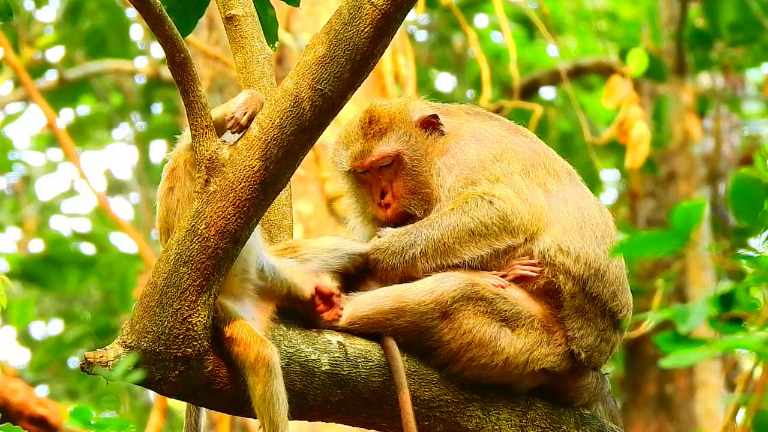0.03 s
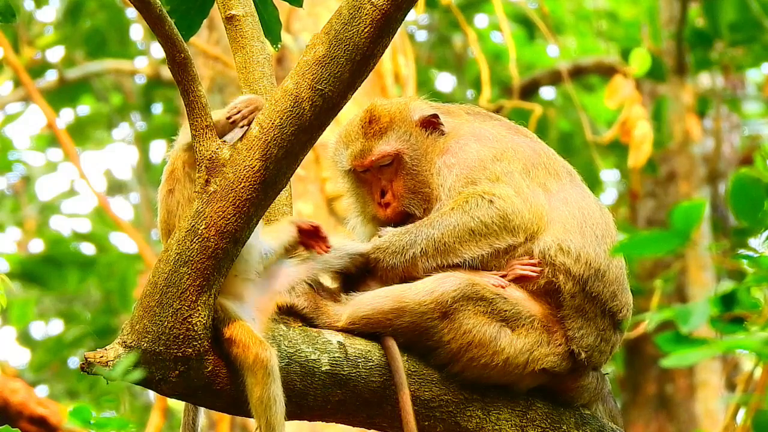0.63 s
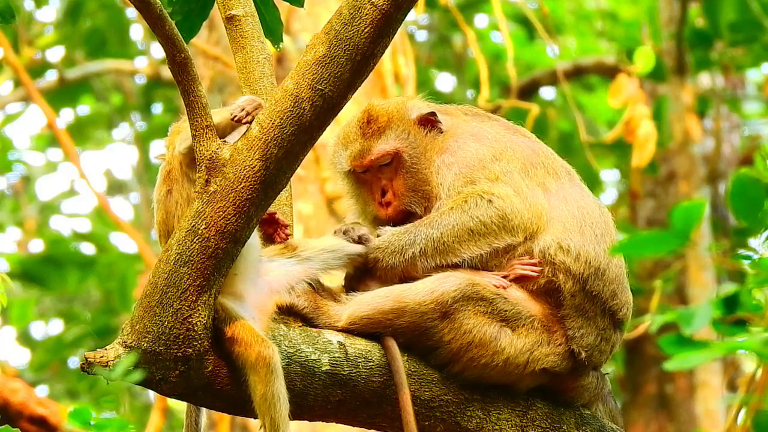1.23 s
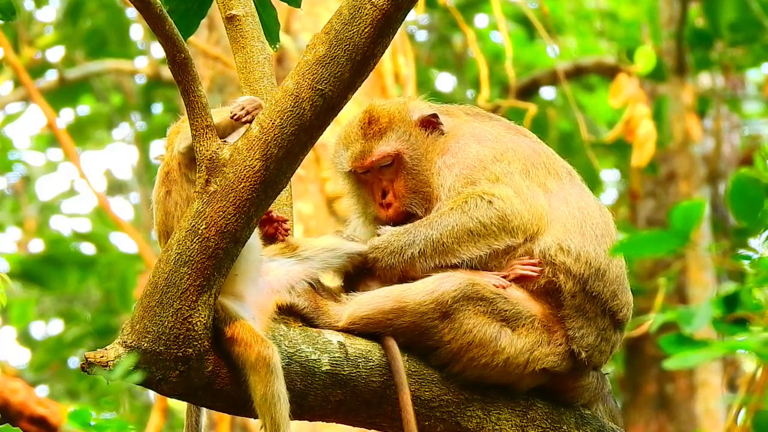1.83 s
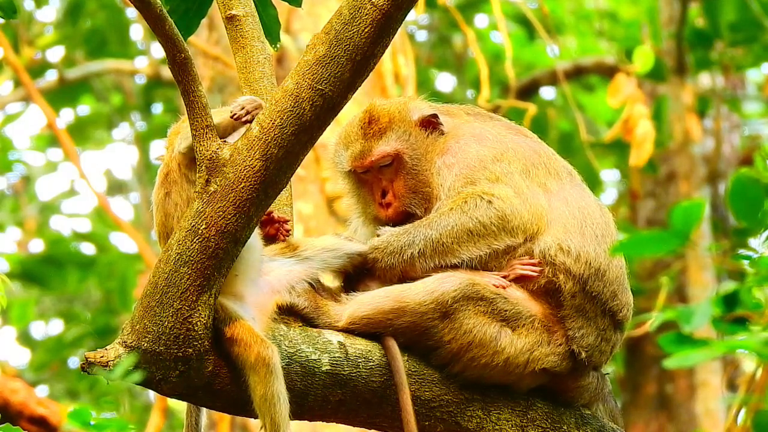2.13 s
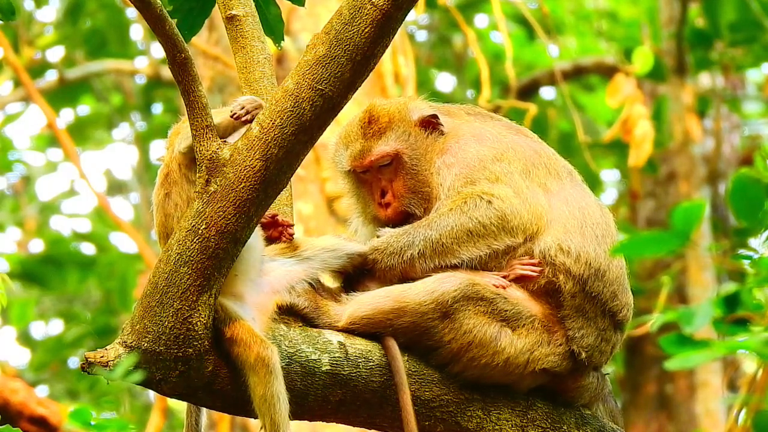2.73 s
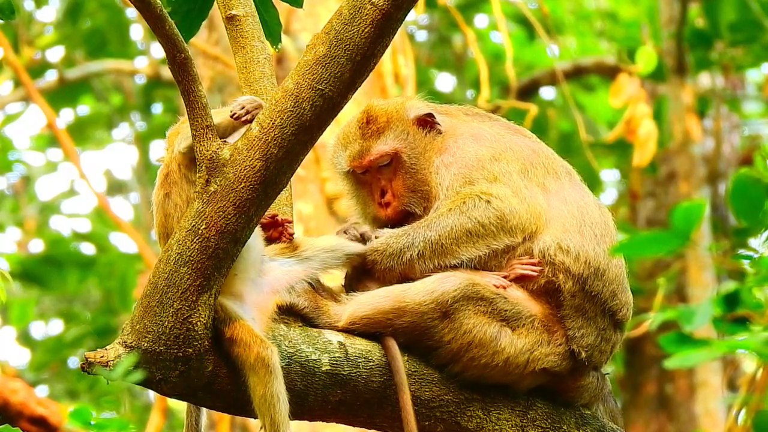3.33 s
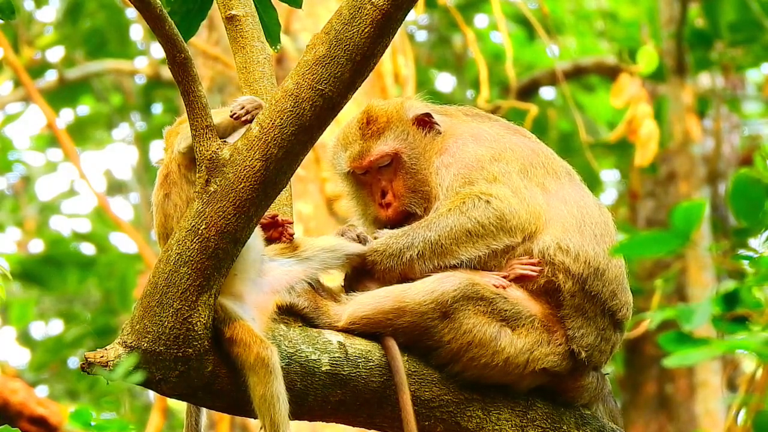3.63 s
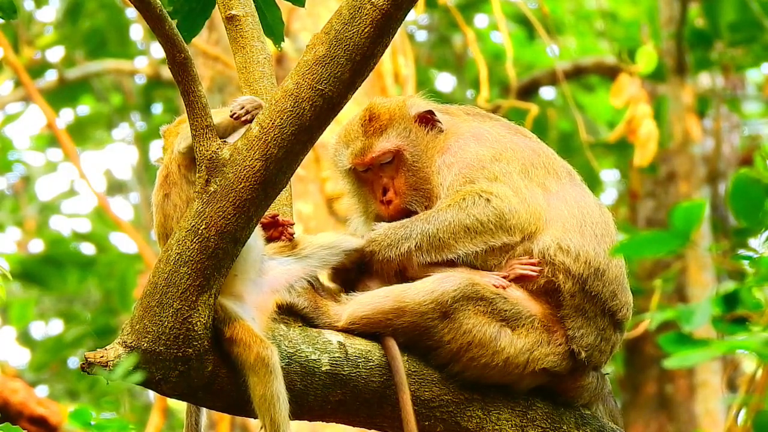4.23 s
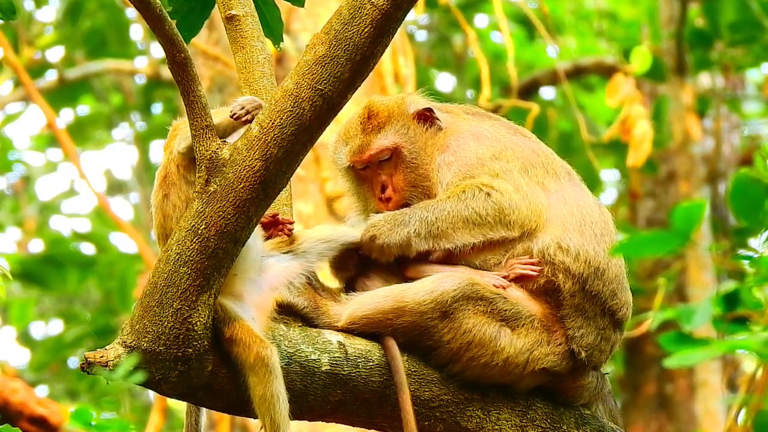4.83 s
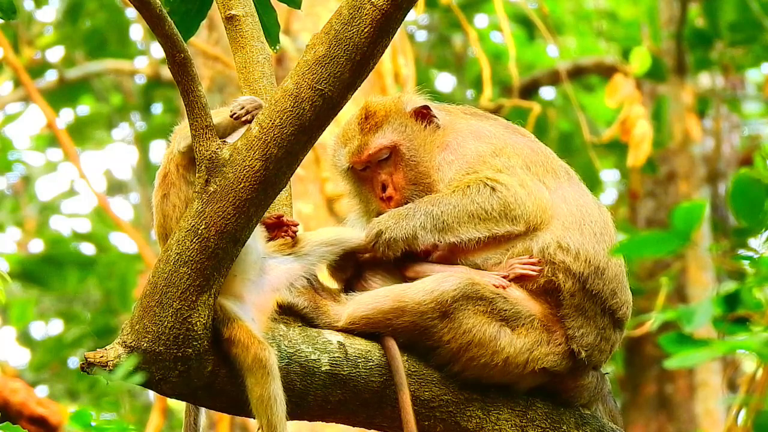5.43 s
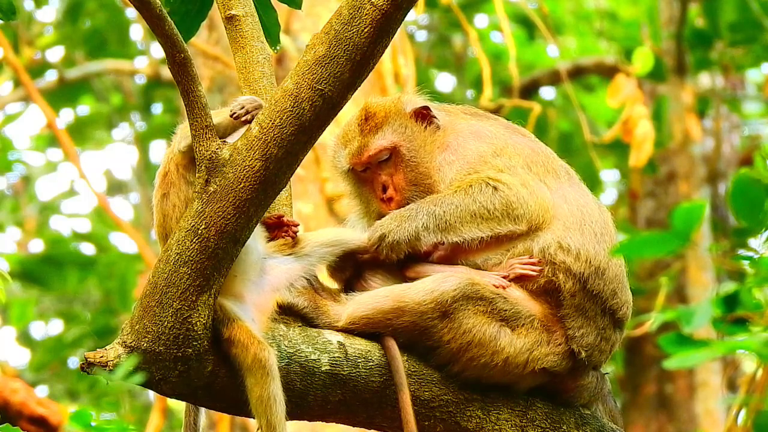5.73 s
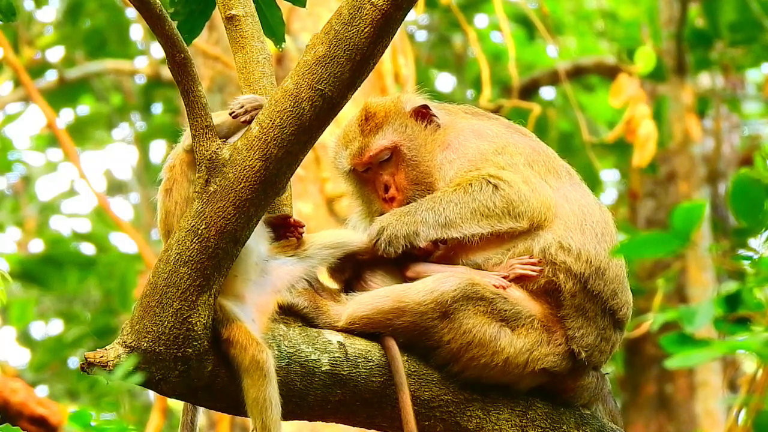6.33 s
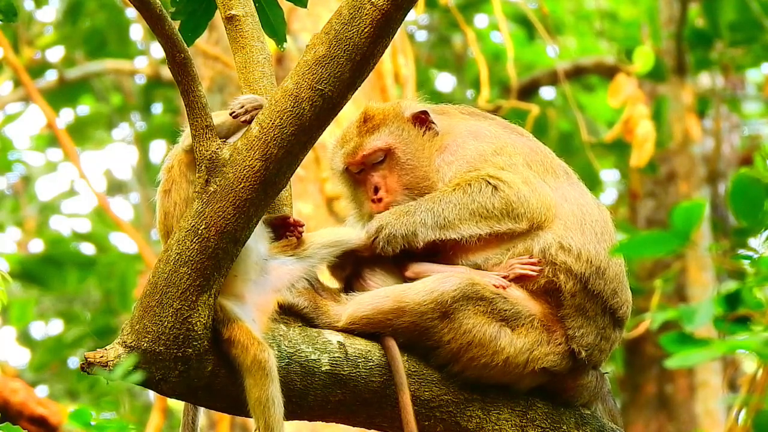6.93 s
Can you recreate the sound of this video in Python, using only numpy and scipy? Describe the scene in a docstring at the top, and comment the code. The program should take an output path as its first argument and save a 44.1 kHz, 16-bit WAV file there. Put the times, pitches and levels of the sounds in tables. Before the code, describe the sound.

In a forest, a low, throbbing engine far away and a faint insect hiss are heard first. Then an infant monkey in front of the microphone cries five times, the second cry weaker and broken. The other four swoop up, sag and turn hoarse, ringing briefly among the trees. Small squeaks and scratchy sounds fall in the gaps, while very faint chirps and a couple of hoots come from the distance.

```python
"""Infant monkey crying in a forest

Four shrill, arched cries sag and turn hoarse, and one more breaks upward; thin whimpers and weak rasps
fall between them. The cries are vocal folds and puffs of air ringing in a small throat, and trunks and
foliage echo them. Behind them a far engine rumbles under faint hoots, chirps and a hiss of insects."""
import sys
import numpy as np
from scipy import signal
from scipy.fft import rfft, irfft, next_fast_len
from scipy.io import wavfile
from scipy.ndimage import uniform_filter1d

SR = 44100
rng = np.random.default_rng(int(sys.argv[2]) if len(sys.argv) > 2 else 0)


def digitize_waveform(pressure):
    """Quantize a signal to 16-bit integers and store it at the path in sys.argv[1].

    Rows of a 2-D input are taken as channels; values are limited to [-1, 1].
    """
    field = np.atleast_2d(pressure).T
    bounded = np.clip(field, -1, 1)
    quanta = np.round(bounded * 32767).astype(np.int16)
    wavfile.write(sys.argv[1], SR, quanta)


N = 312669
TIME = np.arange(N) / SR

# resonances of the small throat and mouth: freq_hz, gain_db
THROAT = [(850, -24.5), (1820, -16.5), (2330, -7), (2700, -8), (3100, -8.5), (3450, 0.5), (3720, 2),
          (3980, -7.5), (4250, -16.5), (4520, -12), (4780, -6), (5300, -3), (6200, 1), (7000, -3),
          (8400, -12.5), (9600, -26), (11000, -43.5), (15000, -55)]
# how alike diffuse sound is in the two ears: freq_hz, likeness (0-1)
EAR_LIKENESS = [(60, 0.96), (130, 1), (290, 0.94), (640, 0.94), (1410, 0.91), (3100, 0.76), (6820, 0.27),
                (15000, 0.0)]


def cries(gain_db=-1, tail_s=0.051):
    """Shrill arched calls, clear in the middle and hoarse at the edges."""
    # one cry a row: start_s, crest_s, crack_s, collapse_s, swell_s, start_hz, top_hz, sag_hz_per_s,
    # overshoot_hz, peak_db (before gain_db), bright_db, onset_rough (0-1)
    calls = [(2.902, 2.971, 3.103, 3.125, .15, 772, 922, 452, -2, -17, -2.0, 0.25),
             (4.921, 4.966, 5.130, 5.131, 0.071, 676, 865.3, 102.3, 25.5, -16.5, -2, 0.51),
             (5.825, 5.885, 6.080, 6.094, 0.079, 715, 936, 391, 35, -16.5, -3.5, 0.56),
             (6.747, 6.794, 6.985, 6.986, 0.057, 716, 914.3, 172, -1.5, -16.5, -3.5, 0.46)]
    out = np.zeros(N)
    for call in calls:
        start_s, _, _, collapse_s = call[:4]
        at, t, gate = span(start_s, collapse_s + tail_s, rise_s=0.017, fall_s=0.025)
        pitch, level_db, bright_db, rough = cry_shape(t, *call)
        out[at] += gate * from_db(level_db + gain_db) * mouth(larynx(pitch, rough, THROAT), bright_db)
    return out


def cry_shape(t, start_s, crest_s, crack_s, collapse_s, swell_s, start_hz, top_hz, sag_hz_per_s,
              overshoot_hz, peak_db, bright_db, onset_rough):
    """Pitch, level, brightness and roughness of a cry that swoops up, sags, cracks and collapses."""
    rise_hz_per_s, bend_hz, settle_s, drop_hz, lowest_hz = 4300, 22, 0.01526, 111.6, 620
    swell_db, fade_lead_s, fade_db_per_s = 14.5, 0.074, 91
    clear_rough, collapse_rough, collapse_bright_db = .17, 0.359, -1.17
    before, after = np.maximum(crest_s - t, 0), np.maximum(t - crest_s, 0)
    to_swell = np.maximum(1 - (t - start_s) / swell_s, 0)
    spent = np.exp((t - collapse_s) / .03)
    crack = np.exp(-((t - crack_s) / .013) ** 2)   # a rough burst in the main resonance
    swoop = top_hz + overshoot_hz - rise_hz_per_s * before
    rising = bend_hz * np.logaddexp(swoop / bend_hz, start_hz / bend_hz)   # eases out of start_hz
    falling = top_hz + overshoot_hz * np.exp(-after / settle_s) - sag_hz_per_s * after - drop_hz * spent
    pitch = np.where(t < crest_s, rising, np.maximum(falling, lowest_hz))
    fade_db = fade_db_per_s * np.maximum(t - collapse_s + fade_lead_s, 0)
    level_db = peak_db - swell_db * to_swell ** 2 - fade_db + 0.5 * crack
    thin_db = bright_db + (collapse_bright_db - bright_db) * np.sqrt(np.minimum(spent, 1))
    opening_db = -5 * np.exp((start_s - t) / .02)   # dull while the mouth is still opening
    rough = clear_rough + (onset_rough - clear_rough) * np.sqrt(to_swell)
    rough += (collapse_rough - clear_rough) * spent + 0.13 * crack
    return pitch, level_db, thin_db + opening_db - 1.5 * crack, np.clip(rough, 0, 0.7)


def broken_cry(gain_db=-1, break_s=3.462, odd_db=-8.5):
    """A weaker call that catches, holds a low note, then cracks into a harsh upper register."""
    # course of the call: time_s, pitch_hz, level_db (before gain_db), bright_db, rough (0-1)
    contour = [(3.312, 755, -36.5, -13, 0.9), (3.358, 751, -23, -2, 0.84), (3.385, 769, -25.5, -1.2, 0.15),
               (3.42, 776.4, -25, -1.5, 0.21), (3.451, 761, -29.5, -3, 0.21),
               (3.468, 869.5, -25.5, -2, 0.6), (3.487, 817, -22.5, -1.5, .55),
               (3.549, 810, -25.5, -1.5, 0.6), (3.63, 791, -31.5, -0.5, 0.8)]
    # colour of the narrower mouth before the break: freq_hz, gain_db
    narrow_mouth = [(1600, 4), (2320, 6), (3100, -2), (3850, -12), (4650, 5), (5500, -1)]
    at, t, gate = span(contour[0][0], contour[-1][0], rise_s=0.018, fall_s=0.026)
    pitch, level_db, bright_db, rough = in_time(contour, t)
    broken = np.clip((t - break_s) / 0.0073, 0, 1)
    voice = larynx(pitch, rough, THROAT, odd_db * broken)   # weak odd partials: it sounds an octave up
    held = (1 - broken) * (1 - rough)
    voice += held * (colour(voice, narrow_mouth) - voice)
    out = np.zeros(N)
    out[at] = gate * from_db(level_db + gain_db) * mouth(voice, bright_db)
    return out


def rasps(gain_db=-1, pitch_hz=753, wander=0.065):
    """Weak, scratchy sounds of wandering pitch; two trail the cries like faint echoes."""
    # weak rasps: start_s, length_s, peak_db (before gain_db)
    scratches = [(4.366, 0.071, -33), (5.563, 0.22, -38.5), (6.243, 0.16, -34), (6.453, 0.229, -29.5),
                 (6.709, .07, -28.5)]
    # colour of the rasps: freq_hz, gain_db
    rasp_colour = [(900, -20), (1600, -2), (2200, -3), (2800, -6), (3300, -2), (4600, 2), (5600, -5),
                   (6500, -3.5), (8000, -21), (11000, -38), (15000, -50)]
    out = np.zeros(N)
    for start_s, length_s, peak_db in scratches:
        at, t, gate = span(start_s, start_s + length_s)
        rasp = larynx(pitch_hz * (1 + wander * drift(15, len(t))), rough=0.53, spectrum=rasp_colour)
        level_db = peak_db + swell((t - start_s) / length_s, peak_share=0.23, onset_db=-15, end_db=-10.5)
        out[at] += gate * from_db(level_db + gain_db) * rasp
    return out


def larynx(pitch, rough, spectrum, odd_db=0):
    """Vocal folds and turbulent air through the throat; roughness unsettles every cycle."""
    jitter, wobble, shimmer, air, flutter_db, flare_db = 0.0687, 0.00366, 0.72, 0.75, 2.5, 7
    size = len(pitch)
    pitch = pitch * (1 + wobble * drift(50, size) + jitter * rough ** 2 * drift(158, size))
    phase = 2 * np.pi * np.cumsum(pitch) / SR
    folds = np.zeros(size)
    for k in range(1, 18):
        partial_db = at_hz(spectrum, k * pitch) + flutter_db * drift(20.5, size)
        # as the voice cracks, single partials flare up and drop out
        partial_db += flare_db * rough * np.tanh(drift(47, size))
        folds += from_db(partial_db + odd_db * (k % 2)) * np.sin(k * phase + 2 * np.pi * rng.random())
    folds = evened(folds) * (1 + shimmer * rough * np.tanh(drift(640, size)))
    # air escapes in a puff each time the folds open, and is duller than the partials
    puffs = colour(rng.standard_normal(size) * (1 + np.cos(phase)), spectrum)
    puffs = signal.sosfilt(signal.butter(4, 7500, fs=SR, output="sos"), puffs)
    return rms_one(folds + air * rough * puffs)


def mouth(voice, bright_db, split_hz=4500):
    """The mouth shifts power from the main resonance to the upper ones; bright_db is their share."""
    low = signal.sosfiltfilt(signal.butter(4, split_hz, fs=SR, output="sos"), voice)
    upper_share = np.clip(from_db(bright_db) ** 2, .05, .95)
    return np.sqrt(1 - upper_share) * evened(low) + np.sqrt(upper_share) * evened(voice - low)


def whimpers():
    """Thin squeaks, most of them falling, through an almost closed mouth."""
    # whimpers: start_s, length_s, start_hz, end_hz, peak_db, peak_share (0-1 of the length)
    calls = [(3.11, .14, 1570, 965, -28.5, 0.76), (4.331, .028, 2950, 2540, -31, .3),
             (4.36, .03, 3430, 3130, -32, 0.6), (4.385, .11, 1280, 766, -36.5, 0.64),
             (6.1, 0.066, 1530, 1890, -38, 0.63), (6.68, 0.039, 1070, 1210, -38.5, 0),
             (6.745, 0.093, 1220, 1247, -25.5, 0.27), (6.83, 0.057, 1130, 960, -36, 0.3),
             (6.97, 0.087, 1820, 1746, -36.5, 0.3)]
    return thin_calls(calls, jitter=.027, shimmer_db=2.5, onset_db=-7.5, end_db=-9)


def thin_calls(calls, jitter, shimmer_db, onset_db, end_db, octave_db=-22):
    """Nearly pure, unsteady glides with a faint octave above."""
    out = np.zeros(N)
    for start_s, length_s, start_hz, end_hz, peak_db, peak_share in calls:
        at, t, gate = span(start_s, start_s + length_s)
        progress = (t - start_s) / length_s
        pitch = start_hz + (end_hz - start_hz) * progress
        level_db = peak_db + swell(progress, peak_share, onset_db, end_db)
        phase = 2 * np.pi * np.cumsum(pitch * (1 + jitter * drift(105, len(t)))) / SR
        tone = np.sqrt(2) * (np.sin(phase) + from_db(octave_db) * np.sin(2 * phase))
        out[at] += gate * from_db(level_db + shimmer_db * drift(49, len(t))) * tone
    return out


def mic_ports(x):
    """The two microphone ports shade and delay the direct sound differently at each frequency."""
    # shading between the ports: freq_hz, left_over_right_db
    shading = [(1300, -2.2), (2400, -3), (4400, 0.3), (8000, -0.2)]
    # phase between the ports: freq_hz, left_lead_rad
    lead = [(2000, -0.015), (4300, -0.46), (5800, -0.64), (9500, -0.49)]
    size = next_fast_len(N)
    hz = np.arange(size // 2 + 1) * SR / size
    left = from_db(at_hz(shading, hz) / 2) * np.exp(.5j * at_hz(lead, hz))
    return irfft(rfft(x, size) * np.array([left, 1 / left]), size)[:, :N]


def forest(x, near_db=-7, near_t60_s=0.58, far_db=-12, build_s=0.019):
    """A few trunks answer clearly; foliage scatters a tail that builds up, and far trees draw it out."""
    # decay of the far trees' echo: freq_hz, t60_s
    far_t60 = [(1000, 4.2), (2600, 3.1), (3700, 1.2), (6500, 1.7), (10000, 0.92)]
    # echoes off the branch and the nearest trunks: delay_s, level_db, left_over_right_db
    trunks = [(.0032, -27, 1), (0.0109, -12, 11), (.031, -21, 6), (0.046, -25, -1), (.077, -20.5, -6)]
    t = TIME[:SR]
    edges = np.geomspace(500, 16000, 11)
    response = np.zeros((2, SR))
    for low, high in zip(edges, edges[1:]):
        hz = np.sqrt(low * high)
        band = signal.butter(2, [low, high], "band", fs=SR, output="sos")
        mid, side = signal.sosfilt(band, rng.standard_normal((2, SR)))
        scatter = spread(mid, side, hz)
        for level_db, t60_s in (near_db, near_t60_s), (far_db, at_hz(far_t60, hz)):
            decay = np.exp(-np.log(1000) * t / t60_s) * np.minimum(t / build_s, 1)
            response += from_db(level_db) * scatter * decay / np.linalg.norm(decay)
    for delay_s, level_db, left_db in trunks:
        response[:, round(delay_s * SR)] += pan(from_db(level_db), left_db)[:, 0]
    # long waves pass round the leaves and stems, and the shortest are absorbed
    leaves = signal.butter(3, [1500, 7800], "band", fs=SR, output="sos")
    return signal.fftconvolve(x[None], signal.sosfilt(leaves, response), axes=1)[:, :N]


def engine(gain_db=0.2, rumble_db=-2.5, waver=0.02496, throb_db=2.5):
    """A far engine: wavering, throbbing low tones in a rumble."""
    # slow swells of the engine: time_s, level_db (before gain_db)
    swells = [(0, -32.5), (1.3, -31.0), (2.6, -30), (3.7, -28), (4.9, -32), (5.9, -28.5), (7.09, -31)]
    # colour of the rumble: freq_hz, gain_db
    rumble_colour = [(22, -41), (35, -31), (50, 0), (62, -1.5), (80, 5), (105, 5), (135, 1.5), (160, -1),
                     (200, -12), (260, -22), (400, -53.5)]
    # engine tones: pitch_hz, relative_db
    tones = [(101.7, -4.5), (126.8, -12), (78.2, -19.5)]
    hum = np.zeros(N)
    for hz, relative_db in tones:
        phase = 2 * np.pi * np.cumsum(hz * (1 + waver * drift(3.91, N))) / SR
        hum += np.sqrt(2) * from_db(relative_db + throb_db * drift(5, N)) * np.sin(phase)
    rumble = from_db(rumble_db) * stereo_noise(rumble_colour)
    return from_db(in_time(swells, TIME)[0] + gain_db) * (hum + rumble)


def far_hoots():
    """A faint whistle and two hoots, each nearly level in pitch."""
    # far calls: start_s, length_s, start_hz, end_hz, peak_db, peak_share (0-1 of the length)
    calls = [(3.15, 0.14, 3860, 3880, -36, .3), (3.7, .6, 642, 636, -48.5, 0),
             (4.5, 0.13, 490, 464, -43.5, .35)]
    return thin_calls(calls, jitter=0.0063, shimmer_db=4, onset_db=-14, end_db=-8)


def far_chirps(count=80, length_s=.09, lowest_hz=330, level_db=-53, spread_db=3, db_per_octave=-2):
    """Faint blips from far off, at random times and pitches, weaker with each octave."""
    calls = []
    for when, height, glide, strength in rng.random((count, 4)):
        octaves = 2.2 * height
        start_hz = lowest_hz * 2 ** octaves
        end_hz = start_hz * 2 ** ((glide - .5) / 4)
        peak_db = level_db + db_per_octave * octaves + spread_db * (2 * strength - 1)
        calls.append((when * (N / SR - length_s), length_s, start_hz, end_hz, peak_db, .5))
    return thin_calls(calls, jitter=.02, shimmer_db=5.5, onset_db=-1, end_db=-3)


def canopy(hiss_db=-40.5):
    """Leaves and a far insect chorus, from which a few thin tones stand out."""
    # colour of air and insects in the treetops: freq_hz, gain_db
    hiss_colour = [(200, 1.5), (330, 0.5), (650, 0), (1000, -2), (1450, -3.5), (1900, -5.5), (3900, -8.5),
                   (4700, -4.5), (6500, -5), (7400, -12.5), (8500, -22.5), (10000, -29.5), (12500, -38),
                   (15500, -50)]
    # insect tones: pitch_hz, width_hz, level_db
    insects = [(2712, 28, -55), (3700, 15, -63), (4170, 5.2, -70.5), (5480, 45, -60.5)]
    out = from_db(hiss_db) * stereo_noise(hiss_colour)
    for hz, width_hz, level_db in insects:
        phase = 2 * np.pi * hz * TIME
        tone = drift(width_hz / 2, N) * np.sin(phase) + drift(width_hz / 2, N) * np.cos(phase)
        out += from_db(level_db) * tone
    return out


def from_db(db):
    """Decibels to gain."""
    return 10 ** (np.asarray(db) / 20)


def rms_one(x):
    """Scale to rms 1."""
    return x / np.sqrt(np.mean(x ** 2) + 1e-20)


def evened(x):
    """Hold the short-term rms at 1."""
    return x / np.sqrt(uniform_filter1d(x ** 2, size=1100) + 1e-12)


def in_time(rows, t):
    """Each column of a curve at the times t."""
    times, *columns = np.transpose(rows)
    return [np.interp(t, times, column) for column in columns]


def at_hz(points, hz):
    """Read a spectrum on a log-frequency axis."""
    freqs, values = np.transpose(points)
    return np.interp(np.log(np.maximum(hz, 1)), np.log(freqs), values)


def span(start_s, end_s, rise_s=0.0039, fall_s=0.0045):
    """The samples that a call covers, their times and a soft gate."""
    at = np.flatnonzero((TIME >= start_s) & (TIME <= end_s))
    t = TIME[at]
    return at, t, np.clip(np.minimum((t - t[0]) / rise_s, (t[-1] - t) / fall_s), 0, 1)


def swell(progress, peak_share, onset_db, end_db):
    """Level in dB of a call that grows to its peak and fades, as progress runs from 0 to 1."""
    return np.interp(progress, [0, np.clip(peak_share, .05, .95), 1], [onset_db, 0, end_db])


def drift(rate_hz, size):
    """Smooth random wander, about 1 in rms, that moves at about the given rate."""
    pole = np.exp(-8 * np.pi * rate_hz / SR)   # runs at a quarter of the sample rate
    noise = rng.standard_normal(size // 4 + 9000)
    slow = signal.lfilter([1], [1, -2 * pole, pole * pole], noise)[8000:]
    return np.interp(np.arange(size) / 4, np.arange(len(slow)), rms_one(slow))


def colour(x, spectrum):
    """Shape a signal with an EQ curve; rms 1."""
    size = next_fast_len(x.shape[-1])
    gain = from_db(at_hz(spectrum, np.arange(size // 2 + 1) * SR / size))
    return rms_one(irfft(rfft(x, size) * gain, size)[..., :x.shape[-1]])


def spread(mid, side, hz):
    """Mid and side to left and right: narrow in the bass, wide in the treble."""
    alike = np.clip(at_hz(EAR_LIKENESS, hz), 0, 1)
    return np.sqrt((1 + alike) / 2) * mid + np.sqrt((1 - alike) / 2) * side * [[1], [-1]]


def stereo_noise(spectrum):
    """Diffuse coloured noise; rms 1."""
    size = next_fast_len(N)
    mid, side = rfft(rng.standard_normal((2, size)))
    pair = spread(mid, side, np.arange(size // 2 + 1) * SR / size)
    return colour(irfft(pair, size)[:, :N], spectrum)


def pan(x, left_db):
    """Level difference between the ears."""
    return x * from_db(np.array([[left_db], [-left_db]]) / 2)


def scene():
    """The monkey straight ahead, the forest all round."""
    ahead = cries() + broken_cry() + rasps() + whimpers()
    far_off = engine() + far_hoots() + far_chirps()
    return mic_ports(ahead) + forest(ahead) + pan(far_off, left_db=-1.0) + pan(canopy(), left_db=-0.56)


def record(dry):
    """A steep high cut at 15.5 kHz."""
    return signal.sosfilt(signal.ellip(10, .1, 80, 15500, fs=SR, output="sos"), dry)


dry = scene()
out = record(dry)
digitize_waveform(out)
```